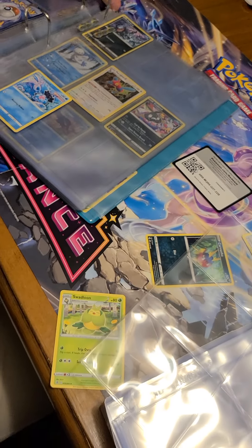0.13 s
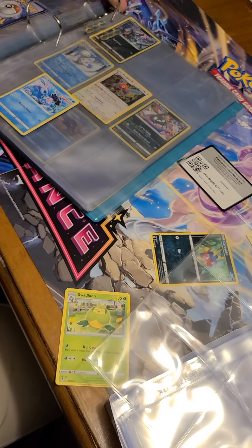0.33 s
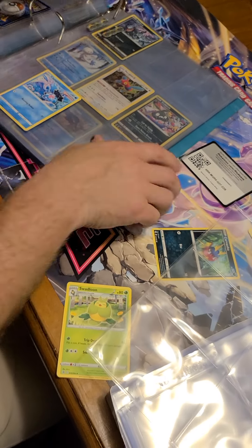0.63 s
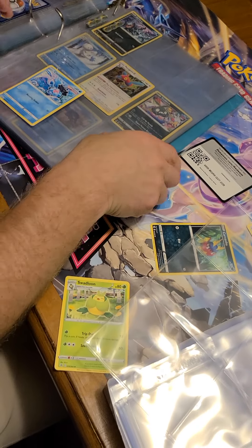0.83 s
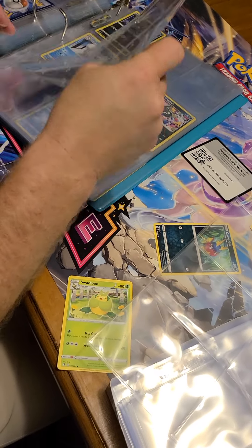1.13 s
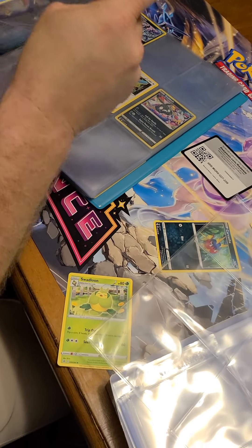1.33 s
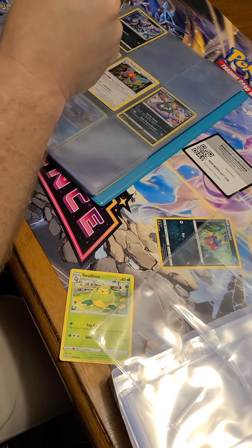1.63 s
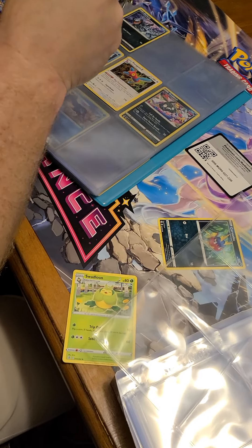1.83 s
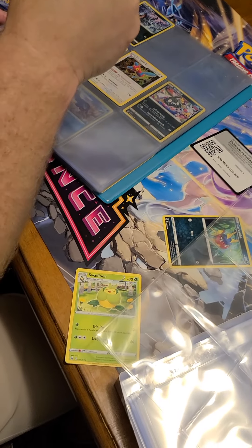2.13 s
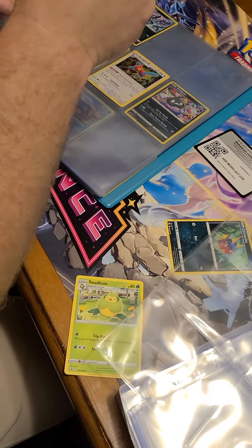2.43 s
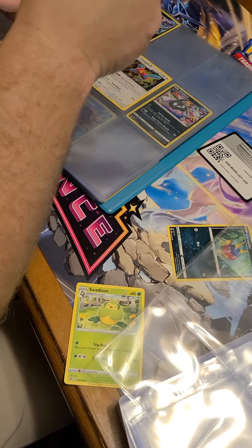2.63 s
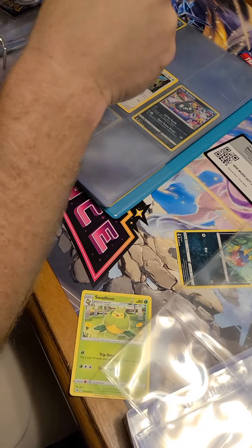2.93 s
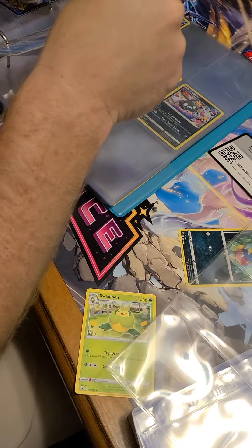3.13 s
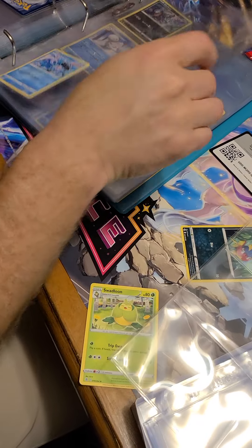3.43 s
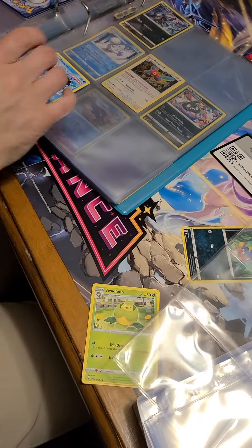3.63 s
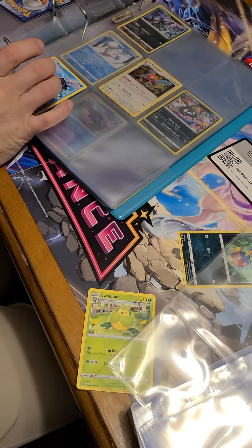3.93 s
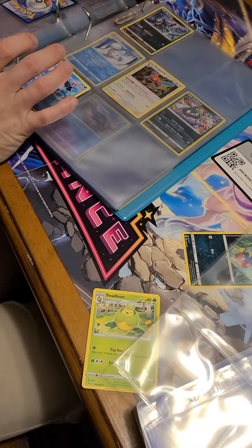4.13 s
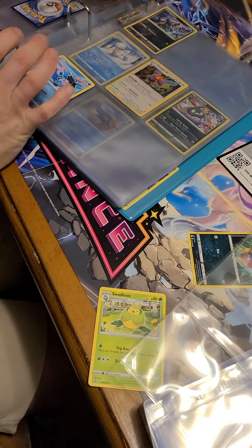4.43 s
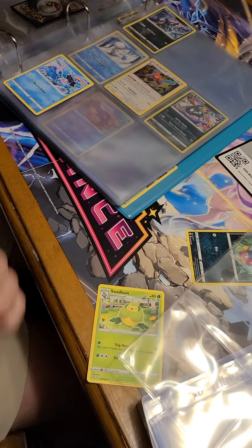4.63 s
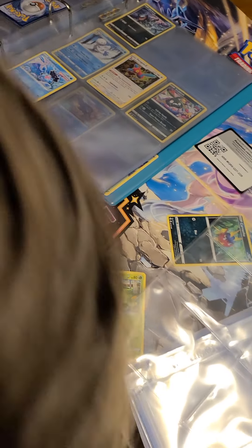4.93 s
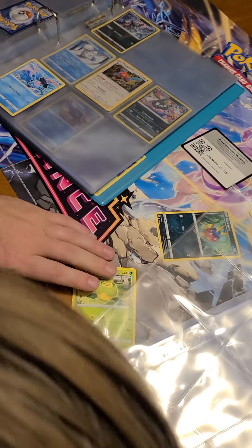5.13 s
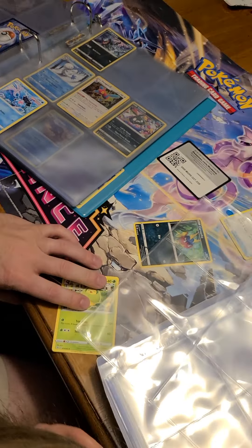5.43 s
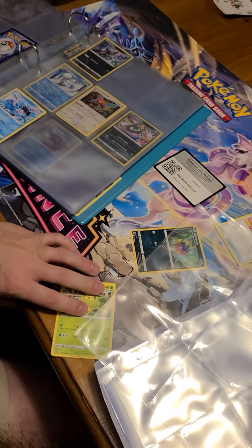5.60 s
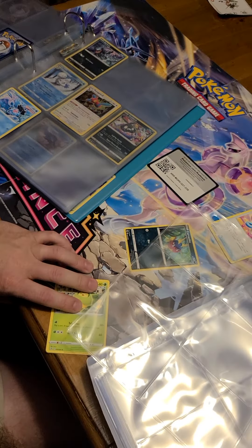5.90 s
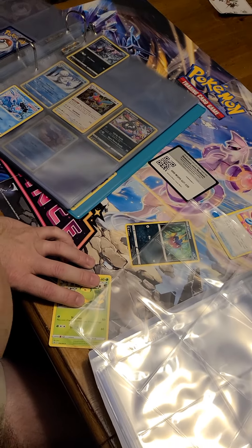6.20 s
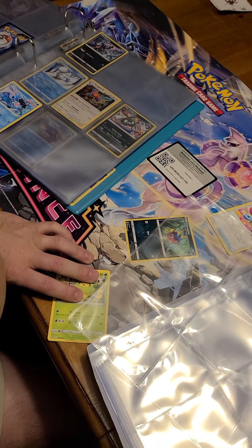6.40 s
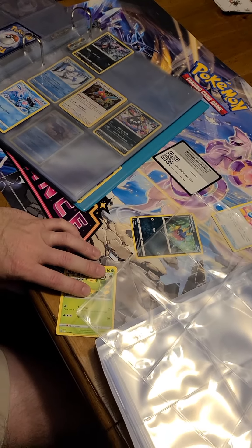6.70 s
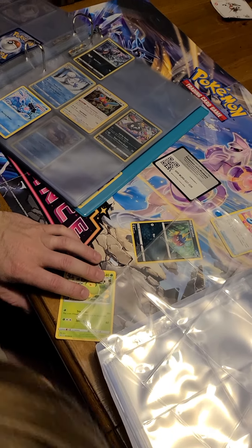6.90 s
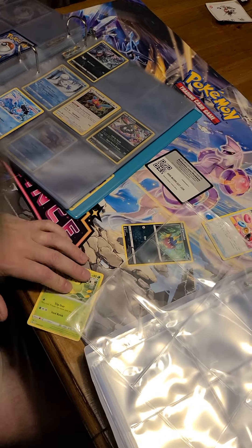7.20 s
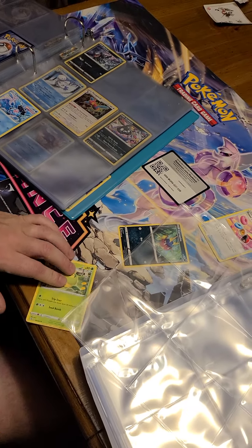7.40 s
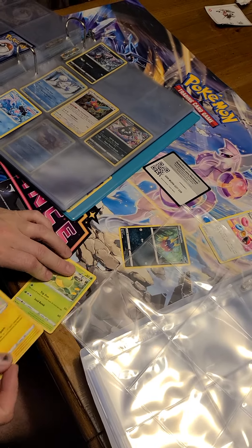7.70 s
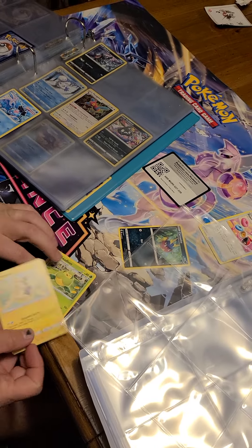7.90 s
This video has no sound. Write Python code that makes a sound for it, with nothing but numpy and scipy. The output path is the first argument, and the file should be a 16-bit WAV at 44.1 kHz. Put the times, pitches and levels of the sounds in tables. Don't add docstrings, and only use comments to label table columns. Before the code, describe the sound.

Binder pages handled close to a stereo microphone indoors. A loud plastic slap opens, then faint knocks, film flicks and palm rubs, a few sharper taps just before four seconds, and another loud crackling slap with a low puff of air. Afterwards only quiet sliding, soft thuds and tiny card-edge clicks, ending on a firmer tap, over a steady low hum.

```python
import sys
import numpy as np
from scipy import signal
from scipy.fft import rfft, irfft, next_fast_len
from scipy.io import wavfile
from scipy.ndimage import map_coordinates

SR = 44100
rng = np.random.default_rng(int(sys.argv[2]) if len(sys.argv) > 2 else 0)


def dump(signal):
    limited = np.clip(np.atleast_2d(signal).T, -1, 1)
    pcm = np.round(limited * 32767).astype(np.int16)
    wavfile.write(sys.argv[1], SR, pcm)


def voltage_ratio(level):
    return 10 ** (np.asarray(level, float) / 20)


N = 355093

# [Hz, dB per Hz]
THIN_EDGE = [(4500, -17.5), (7000, -8.5), (9000, 6.5), (12000, 4.5), (15500, -1.5)]


def unit(x):
    return x / np.sqrt(np.mean(np.abs(x) ** 2) + 1e-20)


def along(points, hz):
    f, v = np.transpose(points)
    return np.interp(np.log(hz + 1), np.log(f + 1), v)


def wobble(rate):
    knots = rng.standard_normal(int(N * rate / SR) + 4)
    return map_coordinates(knots, [np.arange(N) * rate / SR])


def filtered(x, response):
    m = next_fast_len(x.shape[-1] + 8192)
    return irfft(rfft(x, m) * response(np.fft.rfftfreq(m, 1 / SR)), m)[..., :x.shape[-1]]


def causal(spectrum):
    def response(hz):
        cep = irfft(np.log(voltage_ratio(along(spectrum, hz)) + 1e-6))
        half = len(cep) // 2
        cep[1:half] *= 2
        cep[half + 1:] = 0
        return np.exp(rfft(cep))
    return response


def modes(table, soft_hz):
    def response(f):
        total = 0
        for k, (centre, width, db) in enumerate(table):
            loss = 1j * f * width
            total = total + (-1) ** k * voltage_ratio(db) * loss / (centre * centre - f * f + loss)
        return total / (1 + 1j * f / soft_hz) ** 2
    return response


def burst(t60, rise, response, blow=0):
    t = np.arange(SR // 10) / SR
    force = rng.standard_normal(len(t)) * voltage_ratio(-60 * t / t60) * (1 - np.exp(-t / rise))
    x = filtered(force / np.linalg.norm(force) + blow * signal.unit_impulse(len(t)), response)
    return x / np.max(np.abs(x))


def add(out, x, s):
    part = out[:, max(round(s * SR), 0):][:, :x.shape[1]]
    part += x[:, :part.shape[1]]


def heard(x, pan_db, lag, wet_db):
    # [Hz, 0 to 1]
    walls_alike = [(100, 0.91), (300, 0.97), (700, 0.48), (1500, .1), (4000, 0.091)]
    # [Hz, s]
    room_decay = [(150, 0.49), (500, 0.22), (2000, .26), (5000, 0.17), (12000, 0.19)]
    hz, t, z = signal.stft(rng.standard_normal((2, SR // 3)), SR, nperseg=256)
    turn = np.arccos(np.clip(along(walls_alike, hz), 0, 1))[:, None] / 2
    common, opposed = np.cos(turn) * z[0], np.sin(turn) * z[1]
    z = np.array([common + opposed, common - opposed])
    tail = signal.istft(z * voltage_ratio(-60 * t / along(room_decay, hz)[:, None]), SR, nperseg=256)[1]
    tail *= 1 - np.exp(-np.arange(tail.shape[1]) / (0.0032 * SR))
    wet = signal.fftconvolve(x[None], tail / np.linalg.norm(tail[0]), axes=1)

    half = np.array([[.5], [-.5]])
    delay_s = lag * half + .001
    dry_pair = np.pad(x, (0, wet.shape[1] - len(x))) * voltage_ratio(pan_db * half)
    direct = filtered(dry_pair, lambda f: np.exp(-2j * np.pi * f * delay_s))
    return direct + voltage_ratio(wet_db) * wet


def pair(spectrum):
    # [Hz, 0 to 1; beyond is clipped]
    alike = [(60, 0.92), (180, 1), (550, 0.42), (1650, -0.05), (4970, -1.6), (15000, -0.02)]

    def mid_side(hz):
        turn = np.arccos(np.clip(along(alike, hz), 0, 1)) / 2
        return voltage_ratio(along(spectrum, hz)) * [np.cos(turn), np.sin(turn)]
    mid, side = filtered(rng.standard_normal((2, N)), mid_side)
    return unit(np.array([mid + side, mid - side]))


def hand(s):
    # [s, dB, dB]
    places = [(.75, 2, 0), (.95, -14.5, -6.5), (1.2, 6.5, -2), (1.6, -3, -8), (3.6, 3, -1), (3.95, 4.5, -1),
              (4.0, -8, -2.5), (6.7, -4.5, -4), (8, -7, 0.5)]
    at, pan_db, room_db = np.transpose(places)
    return np.interp(s, at, pan_db), np.interp(s, at, room_db)


def hands_lag(s):
    return np.interp(s, [4.4, 5.6], [-.0003, .00025])


def landing(lag, room_db, crack_room_db, cracks, film, blows, body):
    out = np.zeros((2, N))
    for s, db, t60 in cracks:
        crack = voltage_ratio(db) * burst(t60, 0.001, causal(film), blow=0.33)
        add(out, heard(crack, 0, lag, crack_room_db), s - .0015)
    ring = filtered(signal.unit_impulse(SR // 5), modes(body, soft_hz=2100))
    ring /= np.max(np.abs(ring))
    drum = np.zeros((1, SR // 4))
    first_s = blows[0][0]
    for s, db in blows:
        add(drum, voltage_ratio(db) * ring[None], s - first_s)
    add(out, heard(drum[0], -4.5, lag, room_db), first_s - .0015)
    return out


def slaps():
    # [s, dB, s]
    first_cracks = [(0.235, -39.5, 0.016), (0.2753, -15.5, 0.036), (0.277, -9, 0.008)]
    second_cracks = [(4.342, -25.5, 0.018), (4.3438, -3.5, 0.031), (4.351, -12, 0.12)]
    # [Hz, dB per Hz]
    first_film = [(900, -34.5), (1600, -14), (3300, -10), (4250, -2.5), (5100, -6), (6200, -12.5),
                  (7300, -13), (10600, -9.5), (15800, -20.5)]
    second_film = [(880, -18.5), (1500, -4), (1930, -11.5), (3170, -11), (5220, -8), (6250, -16.5),
                   (11600, -13), (14500, -15.5), (16300, -21)]
    # [s, dB]
    first_blows = [(0.274, -20), (.2800, 0.5), (.2838, -3), (0.2873, -2.5), (0.3012, -8)]
    second_blows = [(4.3415, -20.5), (4.3440, -5.5), (4.3470, -13), (4.35, -16), (4.3560, -14.5),
                    (4.365, -18)]
    # [Hz, Hz, dB]
    cover = [(235, 79, -12.5), (345, 35, -3), (624, 140, 2), (890, 91, -5), (1297, 550, -8.5),
             (1900, 500, -23)]
    stack = [(184, 170, -11.5), (333, 80, -10), (540, 81, -2), (808, 88, 0.5), (1390, 207, 2),
             (1750, 120, -7), (2916, 670, 2)]
    # left microphone after right [s], room answer to drum and to cracks [dB]
    lags = (-.0003, -.0005)
    room_db = (-4, -2)
    crack_room_db = (-6.5, -2.5)
    first = landing(lags[0], room_db[0], crack_room_db[0], first_cracks, first_film, first_blows, cover)
    second = landing(lags[1], room_db[1], crack_room_db[1], second_cracks, second_film, second_blows, stack)
    return first + second


def flicks():
    # [s, dB, Hz, dB]
    flick_events = [(0.2384, -29, 5265, -2.5), (0.8002, -52, 1900, -22), (0.9506, -52.5, 1870, -50),
                    (0.9863, -60, 3000, -11), (1.009, -46.5, 1440, -22), (1.1065, -52.5, 1700, -37),
                    (1.1997, -29.5, 1780, -28), (1.2105, -41.5, 2715, -24), (2.148, -60, 2600, -18),
                    (3.2003, -62, 1640, -30), (3.5473, -54.5, 2010, -26), (3.6143, -59.5, 1780, -36.5),
                    (3.7648, -48, 3200, -1), (3.7733, -42.5, 3170, 0), (3.9417, -32, 1900, -9),
                    (3.9522, -37, 1750, -30), (3.964, -56, 2530, -16), (3.9986, -32.5, 3000, -12),
                    (4.1692, -57.5, 2600, -19.5), (6.0536, -55.5, 2700, -39), (6.2233, -56.5, 2065, -40),
                    (6.561, -52, 1620, -14.5), (6.573, -53, 2110, -24), (6.712, -45, 1870, -66),
                    (7.1482, -55.5, 1900, -32.5), (8.011, -37, 2940, -13.5)]
    # [Hz, dB per Hz]
    broad_crack = [(1200, -21), (2800, -3.5), (4500, 2.5), (6500, -5), (8500, -23.5), (12000, -40)]
    out = np.zeros((2, N))
    for s, db, hz, crisp_db in flick_events:
        width_hz = .22 * voltage_ratio(0.48 * (db + 41.5)) * hz
        soft_hz = 8 * voltage_ratio(.3 * crisp_db) * hz
        pitch = modes([(hz, width_hz, 0)], soft_hz)
        film = lambda f: pitch(f) + voltage_ratio(crisp_db - 15) * causal(broad_crack)(f)
        x = voltage_ratio(db + 6.5) * burst(0.016, 0.00026, film, blow=0.74)
        x += voltage_ratio(db + crisp_db + 7.5) * burst(0.0081, 0.00019, causal(THIN_EDGE), blow=.7)
        pan_db, room_db = hand(s)
        add(out, heard(x, pan_db, hands_lag(s), room_db), s - .0005)
    return out


def knocks():
    # [s, dB, Hz, dB re knock]
    knock_events = [(0.001, -45, 520, -9), (0.24, -29.5, 348, -9), (0.756, -42.5, 250, -20),
                    (0.8, -52, 900, -14), (0.95, -45.5, 920, -8), (1.008, -45.5, 1390, -14),
                    (1.075, -46, 755, -12), (1.197, -33.5, 1500, -9), (2.011, -53, 386, 3),
                    (2.062, -46, 787, -12), (2.117, -50.5, 900, -3.5), (1.209, -40, 607, -19),
                    (2.415, -50, 155, 1), (3.197, -47.5, 200, -12), (3.458, -57, 328, -16),
                    (3.547, -47, 345, -17), (3.766, -45, 1253, -5), (3.94, -46.5, 550, 0.5),
                    (3.999, -40.5, 476, 10), (4.474, -36.5, 890, -14), (4.648, -46.5, 190, -25),
                    (5.268, -50, 243, -6), (6.053, -49.5, 416, -5.5), (6.164, -40, 344, -16),
                    (6.224, -45.5, 1057, -10), (6.557, -57, 520, -6), (6.711, -40, 1000, 6),
                    (7.186, -43.5, 387, -19.5), (8.009, -35.5, 1030, 1)]
    # [Hz, Hz, dB]
    board = [(476, 18, 7.5), (819, 54, 0.5), (1030, 85, -1.5), (1260, 59, -6)]
    out = np.zeros((2, N))
    for s, db, hz, board_db in knock_events:
        spot = modes([(hz, 62 + 0.056 * hz, 0)], soft_hz=1550)
        rattle_t60_s = min(7 / hz, .025)
        x = burst(rattle_t60_s, 0.00091, spot, blow=0.55)
        x += voltage_ratio(board_db) * burst(0.023, 0.0012, modes(board, soft_hz=2490), blow=1.2)
        room_db = hand(s)[1] + 1.5
        add(out, heard(voltage_ratio(db + 0.64) * x, -2.5, hands_lag(s), room_db), s + 0.00026)
    return out


def ticks():
    # [s, dB, Hz, dB, dB]
    tick_events = [(0.7528, -60, 12210, 3, -3), (3.6544, -69, 10480, -8, 2), (5.313, -52, 9700, -16, -2),
                   (7.4757, -59, 8970, -4, -5.5), (7.5043, -40, 8960, -15, -10)]
    out = np.zeros((2, N))
    for s, db, hz, wet_db, pan_db in tick_events:
        def edge(f):
            resonance = 1j * f * 0.16 * hz / (hz * hz - f * f + 1j * f * 0.11 * hz)
            return causal(THIN_EDGE)(f) * (0.49 + resonance)
        x = voltage_ratio(db + 3.5) * burst(0.0028, 0.00018, edge, blow=0.68)
        add(out, heard(x, pan_db, hands_lag(s), wet_db), s - .0003)
    return out


def stroke(s, db, build, let_go):
    late = np.arange(N) / SR - s
    near = (late > -build) & (late < let_go)
    out = np.zeros(N)
    out[near] = voltage_ratio(db - 60 * np.maximum(-late[near] / build, late[near] / let_go))
    return out


def slides():
    # [s, dB, s, s, dB re scrape]
    strokes = [(0.006, -59.5, .02, 0.42, -13), (0.238, -39.5, 0.031, 0.0095, -12),
               (1.016, -55, .18, 0.064, -15), (1.09, -66, .2, 0.066, -9), (1.436, -67.5, .025, .7, -14),
               (2.146, -76.5, .3, .4, -6), (3.47, -63.5, .15, 0.3, -16.5), (3.55, -72, .05, .6, -11),
               (4.338, -38.5, 0.043, .006, -5.5), (4.451, -47.5, 0.054, 0.31, -10.5),
               (4.601, -64, 0.4, 1.3, -17), (3.94, -53, 0.032, 0.011, -12), (5.314, -68, .04, .06, -12),
               (5.39, -69, 0.85, 0.14, -20), (6.17, -70.5, 0.33, .5, -30.5), (6.566, -54, 0.057, 0.23, -15),
               (7.72, -66, 0.63, 0.24, -1.5), (7.742, -59, 0.14, 0.15, -18), (7.95, -77, 0.62, .3, -4)]
    # [s, dB, s]
    palm_strokes = [(0.002, -53, 0.13), (1.011, -51, 0.13), (1.098, -54, .1), (1.54, -63, .5),
                    (2.06, -63, 0.21), (2.146, -56.5, .2), (3.452, -57, 0.32), (4.335, -35, 0.025),
                    (4.488, -53.5, 0.57), (4.684, -61, .3), (4.782, -63.5, 0.91), (5.366, -58, 0.43),
                    (6.171, -56, 0.28), (6.413, -56.5, .12), (1.117, -52, 0.061), (6.515, -64, .1),
                    (6.57, -50, 0.2), (7.642, -61, 0.28), (7.745, -61.5, .3)]
    # [Hz, dB per Hz]
    scrape_colour = [(700, -28.5), (1500, 2), (2500, -4), (4500, -7), (6200, -13), (7500, -29)]
    rub_colour = [(200, -4.5), (400, 4), (800, 2), (1300, 1.5), (2200, -40)]
    grain = voltage_ratio(1.4 * wobble(140) + 1.6 * wobble(50))
    hiss = unit(grain * pair(THIN_EDGE))
    scrape = unit(grain * pair(scrape_colour))
    rub = unit(grain * pair(rub_colour))
    out = np.zeros((2, N))
    for s, db, build, let_go, hiss_db in strokes:
        out += stroke(s, db, build, let_go) * (scrape + voltage_ratio(hiss_db) * hiss)
    for s, db, length in palm_strokes:
        out += stroke(s, db, 0.46 * length, length) * rub
    return out


def low_air():
    # [s, dB, Hz]
    pushes = [(0.302, -28, 67.7), (.34, -43, 32), (.79, -48, 30.1), (3.57, -43, 30), (3.77, -52, 30),
              (4.365, -31, 66.9), (4.385, -32.5, 28), (4.636, -30.5, 62.5), (4.7, -45, 29.25),
              (7.18, -45.5, 35.3)]
    t, out = np.arange(SR) / SR, np.zeros((1, N))
    for s, db, hz in pushes:
        cycles = t * hz
        swell = voltage_ratio(db - 60 * cycles / 11) * (1 - np.exp(-cycles / 0.87))
        add(out, (swell * np.sin(2 * np.pi * cycles))[None], s)
    return out * voltage_ratio([[-1.2], [1.2]])


def background():
    # [Hz, dB rms]
    hum_tones = [(59.2, -59.5), (118.4, -64)]
    # [Hz, dB per Hz]
    drone_colour = [(20, -19.5), (42, -11.5), (72, 2), (95, -8.5), (125, -6), (180, -13.5), (330, -13),
                    (385, -9.5), (450, -19), (750, -18), (1320, -26), (4900, -37.5), (6300, -45.5),
                    (7000, -56)]
    self_noise = [(6000, -30), (8300, -12), (9000, 2.5), (12000, -3.5), (15700, -2.5)]
    # [Hz, dB]
    lean = [(60, -3.5), (180, -1.5), (550, -2.5), (1650, -0.5), (4970, 5.5), (15000, -7.5)]
    t = np.arange(N) / SR
    hum = np.zeros(N)
    for hz, db in hum_tones:
        level = np.sqrt(2) * voltage_ratio(db + 0.5 + .6 * wobble(3.3))
        hum += level * np.sin(2 * np.pi * hz * t + 0.13 * wobble(4.5))
    swell_db = .3 * wobble(1.5) + .6 * wobble(8)
    drone = voltage_ratio(-54.5 + swell_db) * pair(drone_colour)
    hiss = voltage_ratio(-90) * pair(self_noise)
    return filtered(hum + drone + hiss, lambda hz: voltage_ratio(along(lean, hz) * [[.5], [-.5]]))


def scene():
    return slaps() + flicks() + knocks() + ticks() + slides() + low_air() + background()


def top_cut(x):
    return signal.sosfilt(signal.butter(12, 16630, fs=SR, output="sos"), x)


def record(dry):
    # [Hz, dB]
    port = [(5800, 0.5), (7000, -1.5), (8000, -4.5), (8800, -1)]
    top_hz = 15830
    bent = dry / (1 + np.abs(dry / .98) ** 6) ** (1 / 6)
    mix = filtered(bent, lambda hz: voltage_ratio(along(port, hz)) / (1 + (hz / top_hz) ** 120))
    return top_cut(mix)


dry = scene()
out = record(dry)
dump(out)
```